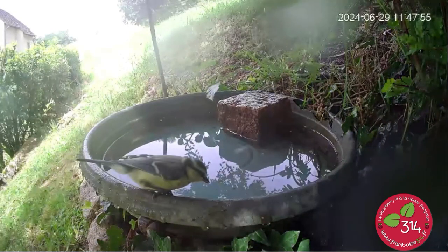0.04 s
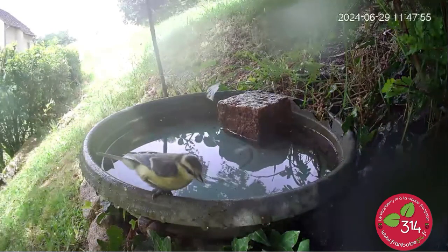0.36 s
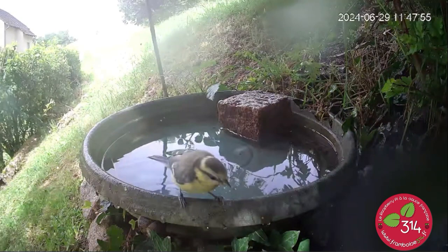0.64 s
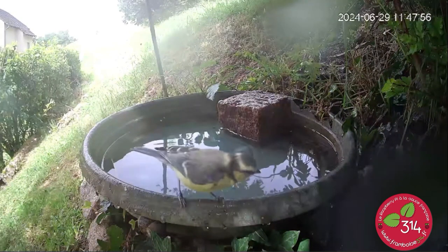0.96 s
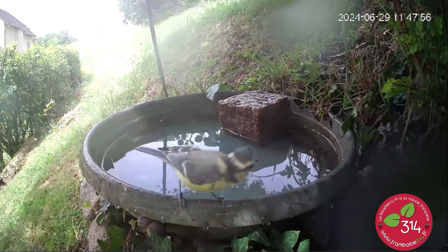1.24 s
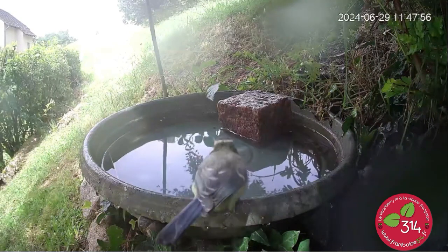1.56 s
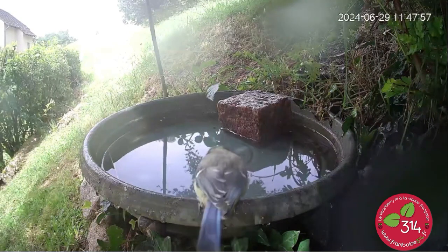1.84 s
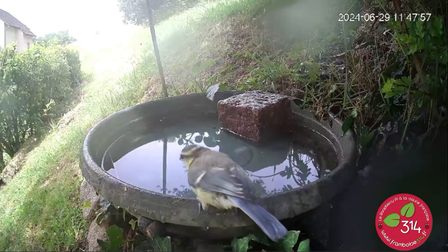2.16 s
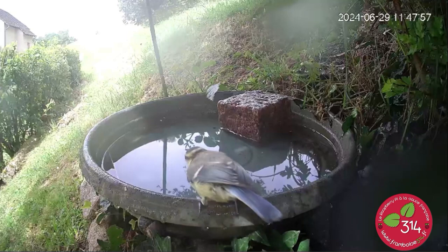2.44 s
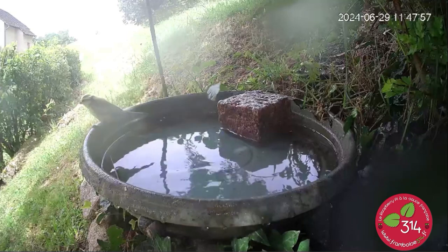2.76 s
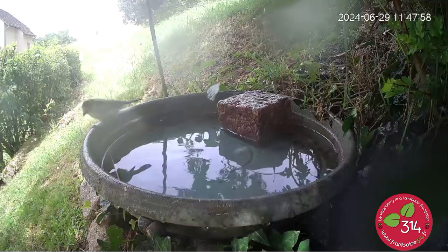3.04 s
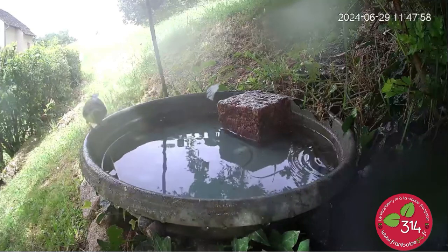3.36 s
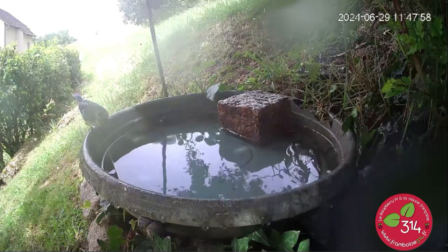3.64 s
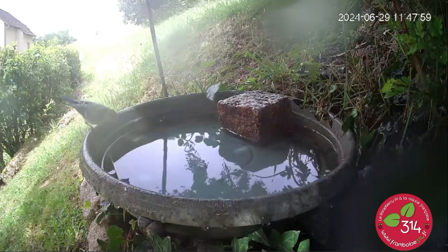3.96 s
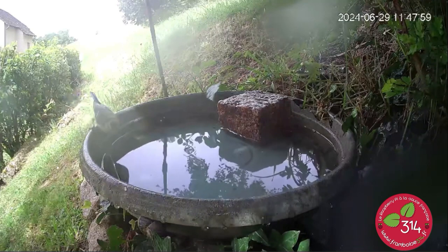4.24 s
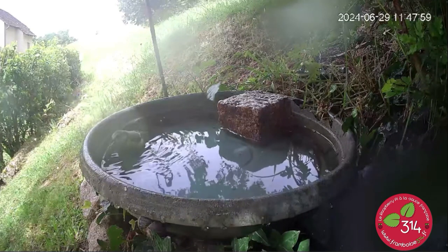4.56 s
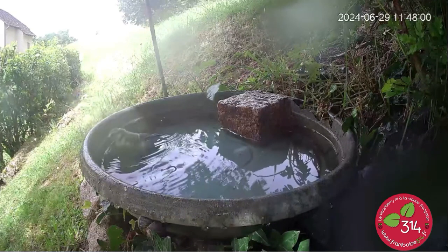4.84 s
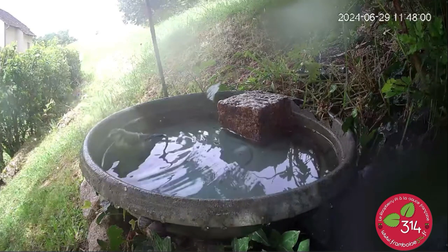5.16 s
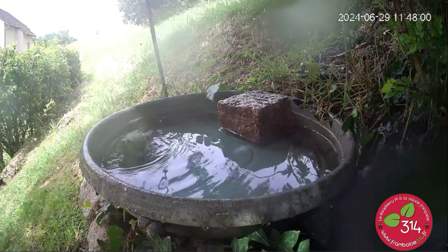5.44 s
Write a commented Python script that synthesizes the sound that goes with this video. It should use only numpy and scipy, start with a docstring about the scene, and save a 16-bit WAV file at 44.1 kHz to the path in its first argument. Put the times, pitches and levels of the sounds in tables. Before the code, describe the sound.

Small, crisp flicks of water come from a birdbath near the microphone as a little bird moves about in it. There is a quick flutter of wings, then, a little past halfway, a sharp tap of a drop on the housing and a softer flutter. The splashes grow fainter after that. Other birds sing and call farther off in the garden, over a faint hiss and low, uneven puffs of wind on the microphone.

```python
"""A quiet garden, heard by a wildlife camera; light gusts and thumps of air rumble on its microphone.
First a far bird sings a short phrase; two others start calls that they repeat to the end.
From half a second on, a small bird hops about a concrete birdbath close by, flicking water.
It flutters at 1.6 seconds. At 3.3 a drop knocks on the camera's case and the bird flutters again.
Softer flicks follow, and a faint, low coo comes from far off at 5 seconds."""
import sys
import numpy as np
from scipy import signal
from scipy.fft import rfft, irfft, next_fast_len
from scipy.io import wavfile
from scipy.ndimage import uniform_filter1d

SR = 44100
rng = np.random.default_rng(int(sys.argv[2]) if len(sys.argv) > 2 else 0)


def wrap_up_sound(samples):
    """Save the sound to the file named by the first command line argument, as 16-bit audio."""
    columns = np.atleast_2d(samples).T
    # keep every value between -1 and 1, then stretch to whole-number steps
    tamed = np.clip(columns, -1, 1)
    steps = np.round(tamed * 32767).astype(np.int16)
    wavfile.write(sys.argv[1], SR, steps)


N = 251370
TIME = np.arange(N) / SR

# Levels in the tables are relative. A ring time is how long a sound takes to fade by 60 dB.
# Flicks of water and claws. Each row: start in seconds, spray level in dB, body level in dB,
# length in seconds, brightness of the spray in dB per kHz.
FLICKS = [(0.553, -50, -53.5, 0.005, -8), (0.5595, -46.5, -58.5, 0.0015, 4), (0.5614, -48, -64, 0.0029, -9),
          (0.566, -64, -62.5, 0.014, 11), (0.57, -49, -66, 0.002, 3), (0.596, -56, -63.5, 0.001, 0),
          (1.408, -54, -67, 0.0038, -15), (1.422, -51, -62.5, 0.0032, -10), (1.44, -61, -53.5, 0.0014, 9),
          (1.465, -51.5, -62.5, 0.0062, -15), (1.492, -43, -56, 0.0015, 0),
          (1.508, -53.5, -59.5, 0.0026, -18), (1.570, -53, -62, 0.0028, -1), (1.604, -64.5, -65, 0.0012, 0),
          (1.645, -45.5, -68, 0.0062, -10), (1.6881, -45, -54, 0.002, 6),
          (1.6923, -39.5, -44.5, 0.0043, 10), (1.719, -48, -55, 0.002, 23), (1.728, -49, -63, 0.0034, 19),
          (2.311, -44, -63, 0.0028, 17), (2.317, -52, -57.5, 0.0022, 15), (2.338, -56, -65, 0.0032, 0),
          (2.815, -61.5, -90, 0.0032, 21), (2.839, -56.5, -90, 0.0013, 13),
          (2.9706, -49.5, -66, 0.0042, 24), (2.981, -55, -61, 0.0051, 10), (3.036, -70, -56, 0.012, 4),
          (3.045, -52.5, -56.5, 0.0067, 5), (3.054, -45, -53, 0.0037, 2), (3.169, -54, -64.5, 0.004, 16),
          (3.24, -55, -66.5, 0.0053, 12), (3.2494, -40.5, -74, 0.001, 7), (3.257, -52, -59, 0.0051, -1),
          (3.2599, -35.5, -51, 0.0036, 1), (3.2658, -37.5, -40, 0.0059, 2),
          (3.2681, -43.5, -39.5, 0.004, 6), (3.276, -50.5, -45, 0.0033, 9), (4.2865, -55, -55, 0.00059, -2),
          (4.292, -69, -69, 0.017, -5), (4.384, -66.5, -69, 0.037, -3), (4.676, -76, -68.5, 0.004, -5),
          (4.712, -74.5, -69.5, 0.0042, -5), (5.326, -68, -73, 0.0032, -2.5),
          (5.376, -59, -63, 0.0041, -3.5), (5.38, -77, -70.5, 0.023, 3), (5.4326, -60, -68, 0.0048, -1),
          (5.61, -63, -69, 0.0057, -2), (5.617, -60.5, -63, 0.011, -1.5)]
# A flick's bright spray and duller body. Each row: pitch in Hz, width in Hz, level in dB.
SPRAY_BANDS = [(4960, 190, -2.5), (5840, 110, -3), (6413, 250, -2.5)]
BODY_BANDS = [(1330, 920, -0.5), (1764, 75, 9), (2400, 1200, -4.5), (2800, 580, -2.5), (3700, 470, -2)]
# Water hitting the case. Each row: start in seconds, level in dB, brightness in dB per kHz.
KNOCKS = [(3.265, -27, -0.8), (3.2687, -35.5, 2.0)]
# The tones of the case. Each row: pitch in Hz, level in dB, ring time in seconds.
CASE_TONES = [(264, -17, 0.24), (408, -15, 0.2), (458, -11, 0.07), (612, -25.5, 0.15), (734, -35, 0.0066),
              (947, -3.5, 0.035), (1005, -2.5, 0.022), (1190, -9.5, 0.021), (1835, -2.5, 0.017),
              (2610, -5, .015), (2940, 1.5, 0.0056), (4050, -5.5, 0.011), (4790, -17, .0088),
              (6500, -11, .004)]
# Bubbles in the bath. Each row: start in seconds, pitch in Hz, level in dB, ring time in seconds.
BUBBLES = [(1.506, 2510, -47.5, 0.018), (3.054, 1910, -37, 0.019), (3.167, 3380, -46.5, 0.025),
           (3.2525, 2830, -34.5, 0.032), (4.382, 1743, -51, 0.083), (5.62, 3250, -49, 0.031)]
# Swells of fluttering. Each row: peak time, build-up and fade in seconds, hiss and air push in dB.
FLUTTERS = [(1.59, 0.045, 0.046, -57, -49), (3.335, 0.0024, 0.045, -69, -53.5),
            (3.51, 0.057, 0.059, -82.5, -54)]
# Downstrokes of the wings. Each row: time in seconds, level in dB.
WINGBEATS = [(1.537, -31), (1.578, -26), (1.62, -34)]
# Song notes. Each row: start and length in seconds, pitch in Hz, glide and arch as shares of the
# pitch, level in dB.
SONG_NOTES = [(0.010, 0.1, 3404, 0.1, 0.00063, -66.5), (0.248, 0.087, 2817, -0.12, -0.0062, -59),
              (0.397, 0.065, 2793, -0.235, -0.016, -55.5), (0.549, 0.05, 2877, -0.07, -0.015, -52.5),
              (0.631, 0.071, 2952, -0.22, -0.021, -51.5), (0.802, 0.051, 2870, -0.39, -0.022, -66.5),
              (0.829, 0.023, 2807, 0.13, -0.0027, -54), (0.843, 0.04, 2873, 0.021, 0.0029, -43.5),
              (0.915, 0.029, 2410, 0.036, -0.0041, -64), (0.944, 0.034, 1975, 0.029, -0.046, -58.5),
              (1.0, 0.07, 3160, 0.05, 0, -68.5), (1.058, 0.069, 3337, 0.054, -0.004, -48),
              (1.117, 0.063, 3518, 0.14, -0.045, -59), (1.236, 0.053, 3216, -0.24, -0.0228, -56.5),
              (1.263, 0.062, 3030, 0.089, -0.028, -50), (1.318, 0.062, 3070, -0.19, 0.05, -61),
              (1.388, 0.076, 3810, -0.072, 0.01, -60.5), (1.423, 0.061, 3782, -0.051, -0.014, -53.5),
              (1.554, 0.039, 2970, -0.056, 0.0064, -49.5), (1.612, 0.041, 2285, -0.088, 0.02, -65)]
# Three-part calls. Each row: the whistle's middle, its length and the upstroke's lead in seconds,
# then the levels of upstroke, whistle and last note in dB.
CHIP_CALLS = [(0.614, 0.044, 0.028, -53, -46.5, -63.5), (2.093, 0.027, 0.012, -50.5, -40.5, -71.5),
              (3.762, 0.041, 0.034, -50, -42.5, -69.5), (5.021, 0.039, 0.032, -46, -43.5, -65)]
# The upstroke's two voices. Each row: delay in seconds, first, middle and last pitch in Hz, level in dB.
UPSTROKE_VOICES = [(0, 5450, 5810, 5980, -0.5), (0.006, 6000, 6710, 7470, -10.5)]
# Far falling calls. Each row: start in seconds, level in dB, change from first to last step in dB.
FALLING_CALLS = [(0.163, -62, 2), (0.938, -57, -5.5), (1.632, -46, -12), (2.291, -51.5, -7.5),
                 (2.973, -55, -1), (4.295, -54, -3), (5.035, -55.5, 0), (5.635, -54.5, -1)]
# The steps of such a call. Each row: delay and length in seconds, pitch and fall in Hz, level in dB.
CALL_STEPS = [(0, 0.082, 4530, 168, -4.5), (0.035, 0.078, 3900, 128, -6.5), (0.055, 0.11, 3250, 99, -8)]
# Far peeps. Each row: start and length in seconds, pitch in Hz, level in dB.
PEEPS = [(1.332, 0.032, 4170, -72.5), (2.144, 0.047, 4110, -68.5), (4.497, 0.039, 4190, -73),
         (4.541, 0.044, 3190, -71), (4.708, 0.048, 4630, -74), (4.804, 0.03, 2260, -80),
         (5.157, 0.049, 2210, -75.5)]
# Echoes from hedge and wall. Each row: delay in seconds, level in dB.
ECHOES = [(.021, -23.5), (.047, -29), (.064, -15), (.077, -21)]
# Gusts and short, deep thumps of air on the microphone. Each row: peak time in seconds,
# deep rumble in dB, upper range in dB, length in seconds.
GUSTS_AND_THUMPS = [(0.408, -49, -88, 0.086), (1.099, -55, -58.5, 0.049), (1.305, -60, -57, 0.059),
                    (1.588, -40, -64, 0.1), (1.738, -62, -55, 0.19), (2.189, -68, -55, 0.051),
                    (2.456, -46.5, -67, 0.038), (2.612, -45.5, -65.5, 0.065), (2.775, -49.5, -63, 0.038),
                    (3.392, -41, -61, 0.043), (3.534, -40.5, -54.5, 0.17), (4.729, -42, -69, 0.054),
                    (5.134, -31, -62, 0.026), (5.228, -40, -58, 0.049), (5.463, -38.5, -73, 0.037)]
# The breeze between them. Each row: time in seconds, deep rumble in dB, upper range in dB.
BREEZE = [(0, -56.5, -71.5), (1.0, -59, -68), (1.4, -58.5, -64), (2.8, -54.5, -63), (3.15, -57.5, -67),
          (3.85, -54.5, -61.5), (4.25, -63, -67.5), (4.898, -54, -65), (5.7, -51.5, -64)]
# The tone colours of five noises. Each row: frequency in Hz, level in dB.
FEATHER_COLOUR = [(300, -1), (480, 2), (800, 0), (1100, -22), (2000, -20), (3500, -13), (5000, -2.5),
                  (6500, -4.5), (7300, -23.5)]
AIR_PUSH_COLOUR = [(40, -23), (100, -0.5), (160, -9.5), (300, -21.5), (600, -29.5), (1500, -35),
                   (5000, -55)]
DEEP_AIR_COLOUR = [(10, -16), (22, 0.5), (45, 3.5), (66, 3), (95, -14.5), (140, -25.5), (220, -42.5),
                   (500, -64.5)]
UPPER_AIR_COLOUR = [(50, -14.5), (100, 2), (150, -6.5), (215, -8), (290, -19), (450, -28), (1000, -57.5)]
HISS_COLOUR = [(60, -4), (140, -5), (210, -6.5), (300, -12), (500, -15.5), (700, -16.5), (1000, -20),
               (1500, -22.5), (3000, -30), (4200, -26), (5700, -29.5), (6800, -31), (7600, -55)]
# Thin crackles of the electronics. Each row: time in seconds, level in dB.
CRACKLES = [(0.6856, -51), (2.086, -45), (4.487, -53.5)]


def water_flicks(drops_per_s=6000, drag_db=-13.5, drag_s=0.0062, fall_db=-24, fall_s=0.013):
    """Water is dragged up, bursts into a cluster of tiny impacts, then falls as thin spray."""
    out, t = np.zeros(N), np.arange(-SR // 20, SR // 8) / SR
    since, until = np.maximum(t, 0), np.maximum(-t, 0)
    highs = signal.butter(3, [4000, 7400], "band", fs=SR, output="sos")
    mids = signal.butter(3, [850, 4000], "band", fs=SR, output="sos")
    for start, spray_db, body_db, length, brightness in FLICKS:
        rise = 1 - np.exp(-(since / (0.14 * length)) ** 2)
        drag = (1 - rise) * gain_of(drag_db) * np.exp(-until / drag_s)
        burst = np.exp(-(since / length) ** 2)
        fall = gain_of(fall_db) * np.exp(-since / fall_s)
        swell = drag + rise * (burst + fall)
        impacts = swell * rng.standard_normal(len(t)) * (rng.random(len(t)) < drops_per_s / SR)
        retune = [1 + 0.023 * rng.standard_normal(), 1, 1]  # each flick has its own size of drop
        tilted = [(hz, width, db + brightness * (hz - SPRAY_BANDS[0][0]) / 1000)
                  for hz, width, db in SPRAY_BANDS]
        spray = unit_level(signal.sosfilt(highs, resonate(impacts, np.multiply(tilted, retune))))
        body = unit_level(signal.sosfilt(mids, resonate(impacts, np.multiply(BODY_BANDS, retune))))
        flick = gain_of(spray_db) * spray + gain_of(body_db) * body
        add(out, start + t[0], flick * np.sqrt(length * SR / len(t)))
    return out


def case_knocks(tick_db=-8, tick_s=0.00029, sway_hz=48, sway_db=-32, sway_ring_s=0.23):
    """A drop ticks on the small case, which rings with little bass; its mount sways with a thud."""
    out, t = np.zeros(N), np.arange(SR // 4) / SR
    for start, db, brightness in KNOCKS:
        ring = np.zeros(len(t))
        for hz, tone_db, ring_s in CASE_TONES:
            fade = gain_of(tone_db + brightness * (hz / 1000 - 1) - 60 * t / ring_s)
            ring += fade * np.sin(2 * np.pi * hz * t)
        tick = gain_of(tick_db) * np.exp(-t / tick_s) * rng.standard_normal(len(t))
        add(out, start, gain_of(db) * (ring + tick))
    out = signal.sosfilt(signal.butter(2, 700, "high", fs=SR, output="sos"), out)
    sway = gain_of(sway_db - 60 * t / sway_ring_s) * (1 - np.exp(-t / 0.002))
    add(out, KNOCKS[-1][0], -sway * np.sin(2 * np.pi * sway_hz * t))
    return out


def bubbles(rise_per_s=0.58):
    """A trapped bubble rings and rises in pitch as it nears the surface."""
    out, t = np.zeros(N), np.arange(SR // 10) / SR
    for start, hz, db, ring_s in BUBBLES:
        cycles = hz * t * (1 + rise_per_s * t)
        loudness = gain_of(db - 60 * t / ring_s) * (1 - np.exp(-t / 0.0012))
        add(out, start, loudness * np.sin(2 * np.pi * cycles))
    return out


def wing_flutters(drops_per_s=130, drop_spread_db=4):
    """As each flutter builds and dies away, feathers hiss, fling droplets and push the air."""
    hiss, push = np.zeros((2, N))
    for peak, build_s, fade_s, hiss_db, push_db in FLUTTERS:
        swell = np.exp(-np.maximum((peak - TIME) / build_s, (TIME - peak) / fade_s) ** 2)
        hiss += gain_of(hiss_db) * swell
        push += gain_of(push_db) * swell
    feathers = patchy(noise(FEATHER_COLOUR), patch_db=3) * flicker(db=4, rate_hz=300)
    drops = rng.random(N) < drops_per_s / SR
    strengths = gain_of(drop_spread_db * np.minimum(rng.exponential(1, N), 3))
    ticks = gain_of(-7) * unit_level(resonate(drops * strengths, SPRAY_BANDS + BODY_BANDS[2:]))
    return hiss * (feathers + ticks) + push * noise(AIR_PUSH_COLOUR)


def wingbeats(stroke_s=0.0056):
    """A close downstroke thumps the microphone: air is pushed, sucked back and settles."""
    out = np.zeros(N)
    for peak, db in WINGBEATS:
        offset = (TIME - peak) / stroke_s
        out += gain_of(db) * (2 * offset ** 2 - 1) * np.exp(-offset ** 2)
    return out


def song(rasp_per_fall=4):
    """A bird warbles gliding notes: the falling ones are raspy, the rising ones clear."""
    out = np.zeros(N)
    for start, length, hz, glide, arch, db in SONG_NOTES:
        bend = hz * (1 - glide / 2), hz * (1 + arch), hz * (1 + glide / 2)
        rasp = rasp_per_fall * max(-glide, 0)
        tone = note(length, bend, waver=0.006, waver_hz=270, rasp=rasp, rasp_hz=254)
        add(out, start, gain_of(db) * tone)
    return garden_echoes(out, tail_db=-8.5, ring_s=0.17, echo_db=-16.5)


def chip_calls(upstroke_s=0.058, last_after_s=0.119):
    """A scratchy rising note, the upstroke, drops into a short whistle; a soft lower note follows."""
    high, low = np.zeros((2, N))
    for middle, length, lead, up_db, whistle_db, last_db in CHIP_CALLS:
        for delay, *bend, voice_db in UPSTROKE_VOICES:
            scratch = note(upstroke_s, bend, taper=4.2, waver=0.015, waver_hz=614,
                           rasp=0.63, rasp_hz=256)
            add(high, middle - lead + delay - upstroke_s / 2, gain_of(up_db + voice_db) * scratch)
        whistle = note(length, (4820, 4860, 4300), taper=2, waver=0.012, waver_hz=400, rasp=0.072)
        add(low, middle - length / 2, gain_of(whistle_db) * whistle)
        last = note(0.028, (4150, 4140, 4100), waver=0.0029, waver_hz=197)
        add(low, middle + last_after_s, gain_of(last_db) * last)
    high *= flicker(db=3, rate_hz=140)
    high = garden_echoes(high, tail_db=-19, ring_s=0.3, echo_db=3, direct_db=-4.5)
    return high + garden_echoes(low, tail_db=-9, ring_s=0.15, echo_db=-6.5)


def falling_calls():
    """A far bird's hoarse, broken call steps down three pitches and echoes through the trees."""
    out = np.zeros(N)
    for start, db, change_db in FALLING_CALLS:
        for delay, length, hz, fall_hz, step_db in CALL_STEPS:
            bend = hz + fall_hz / 2, hz, hz - fall_hz / 2
            step = note(length, bend, waver=0.012, waver_hz=380, rasp=0.9, rasp_hz=212)
            level_db = db + step_db + change_db * delay / CALL_STEPS[-1][0]
            add(out, start + delay, gain_of(level_db) * step)
    out *= flicker(db=2.5, rate_hz=45)
    return garden_echoes(out, tail_db=-9, ring_s=0.14, echo_db=-7, direct_db=-1)


def peeps():
    """Short notes, each around one pitch, only just loud enough to hear."""
    out = np.zeros(N)
    for start, length, hz, db in PEEPS:
        add(out, start, gain_of(db) * note(length, (hz, hz, hz), waver=0.0072, waver_hz=207))
    return garden_echoes(out, tail_db=-12, ring_s=0.04, echo_db=0)


def coo(start_s=4.99, length_s=0.27, hz=497, db=-74):
    """One hollow coo, blurred by distance into a murmur."""
    out = np.zeros(N)
    murmur = note(length_s, (hz, hz, hz), taper=0.35, waver=0.014, waver_hz=12, rasp=1, rasp_hz=22)
    add(out, start_s, gain_of(db) * murmur)
    return out


def air_on_microphone(lump_db=4.5):
    """A lumpy breeze, gusts and short, deep thumps of air: a rumble with a murky upper range."""
    deep, upper = np.zeros((2, N))
    for peak, deep_db, upper_db, length in GUSTS_AND_THUMPS:
        swell = np.exp(-2 * ((TIME - peak) / length) ** 2)
        deep += gain_of(deep_db) * swell
        upper += gain_of(upper_db) * swell
    lumps = wander(N, rate_hz=11)
    times, deep_levels, upper_levels = np.transpose(BREEZE)
    deep = np.hypot(deep, gain_of(np.interp(TIME, times, deep_levels) + lump_db * lumps))
    upper = np.hypot(upper, gain_of(np.interp(TIME, times, upper_levels) - 0.5 * lumps))
    rumble = noise(DEEP_AIR_COLOUR)
    rumble /= np.sqrt(uniform_filter1d(rumble ** 2, size=2600))  # even out the noise's own swells
    rumble *= deep * gain_of(-2) * flicker(db=1, rate_hz=10)
    return rumble + upper * patchy(noise(UPPER_AIR_COLOUR), patch_db=4)


def background_hiss(level_db=-69):
    """A faint background hiss, mottled with brief, watery patches."""
    return gain_of(level_db) * patchy(noise(HISS_COLOUR), patch_db=5.5) * flicker(db=1, rate_hz=33)


def garden_echoes(sound, tail_db, ring_s, echo_db, direct_db=0):
    """Sound arrives straight, as a few clear echoes, and as a soft tail scattered by leaves."""
    t = np.arange(SR // 2) / SR
    scatter = rng.standard_normal(len(t)) * (rng.random(len(t)) < 0.02)
    tail = scatter * gain_of(-60 * t / ring_s) * (1 - np.exp(-t / 0.12))
    response = gain_of(tail_db) * tail / np.linalg.norm(tail)
    for delay, db in ECHOES:
        add(response, delay, gain_of([db + echo_db]))
    return gain_of(direct_db) * sound + signal.fftconvolve(sound, response)[:N]


def note(length_s, bend_hz, waver, waver_hz, taper=1, rasp=0, rasp_hz=300):
    """A bird's note swells and fades, bending through three pitches; rasp is its noisy share."""
    count = int(length_s * SR)
    progress = np.linspace(0, 1, count)
    hz = np.polyval(np.polyfit([0, 0.5, 1], bend_hz, 2), progress)
    hz *= 1 + waver * wander(count, waver_hz)
    tone = np.exp(2j * np.pi * np.cumsum(hz) / SR)
    roughness = wander(count, rasp_hz) + 1j * wander(count, rasp_hz)
    share = np.clip(rasp, 0, 1)
    voice = (tone * (np.sqrt(2 * (1 - share)) + np.sqrt(share) * roughness)).imag
    return abs(np.sin(np.pi * progress)) ** taper * voice


def resonate(sound, bands):
    """Lets a sound ring in several bands and adds them up."""
    return sum(gain_of(db) * signal.lfilter(*signal.iirpeak(hz, hz / width, SR), sound)
               for hz, width, db in bands)


def noise(colour):
    """Noise of level 1 with the given tone colour."""
    hz, db = np.transpose(colour)
    shape_db = np.interp(np.log(np.fft.rfftfreq(N, 1 / SR) + 1), np.log(hz + 1), db)
    return unit_level(irfft(rfft(rng.standard_normal(N)) * gain_of(shape_db), N))


def patchy(sound, patch_db):
    """Makes brief, narrow bands of a noise louder or softer at random; the result has level 1."""
    _, _, grid = signal.stft(sound, SR, nperseg=1024, noverlap=768)
    patches = uniform_filter1d(rng.standard_normal(grid.shape), size=5, axis=0)  # smooth over pitch
    patches = uniform_filter1d(patches, size=8, axis=1)  # and over time
    grid *= gain_of(patch_db * unit_level(patches))
    return unit_level(signal.istft(grid, SR, nperseg=1024, noverlap=768)[1][:N])


def wander(count, rate_hz):
    """A smooth random curve that strays about 1 either side of zero."""
    size = next_fast_len(count + SR // 4)
    smoothing = np.exp(-(np.fft.rfftfreq(size, 1 / SR) / rate_hz) ** 2)
    return unit_level(irfft(rfft(rng.standard_normal(size)) * smoothing, size))[:count]


def flicker(db, rate_hz):
    """A volume that wobbles at random by about this many dB."""
    return gain_of(db * wander(N, rate_hz))


def gain_of(db):
    """Turns decibels into a number to multiply by."""
    return 10 ** (np.asarray(db) / 20)


def unit_level(sound):
    """Scales a sound to an average (rms) level of 1."""
    return sound / np.sqrt(np.mean(sound ** 2) + 1e-20)


def add(mix, start_s, sound):
    """Mixes a sound in at the given time."""
    part = mix[max(round(start_s * SR), 0):][:len(sound)]
    part += sound[:len(part)]


def scene():
    """The birdbath close by, the other birds further off, a faint hiss and rumbling air."""
    near = water_flicks() + case_knocks() + bubbles() + wing_flutters() + wingbeats()
    far = song() + chip_calls() + falling_calls() + peeps() + coo()
    return (near + far + background_hiss() + air_on_microphone())[None]


def record(dry, treble_hz=7350, edge_hz=8091, hiss_db=-100, gap_from_s=0.318, gap_to_s=0.347):
    """The microphone loses high treble and cuts out once; its electronics hiss and crackle faintly."""
    gap = 1.0 * ((TIME > gap_from_s) & (TIME < gap_to_s))
    volume = 1 - 0.99 * uniform_filter1d(gap, size=60)
    heard = signal.oaconvolve(dry * volume, signal.firwin(301, treble_hz, fs=SR)[None], "same")
    electronics = gain_of(hiss_db) * rng.standard_normal(N)
    for start, db in CRACKLES:
        add(electronics, start, gain_of(db) * np.hanning(7))
    steep_cut = signal.firwin(511, edge_hz, window=("kaiser", 9), fs=SR)
    return electronics + signal.oaconvolve(heard, steep_cut[None], "same")


dry = scene()
out = record(dry)
wrap_up_sound(out)
```